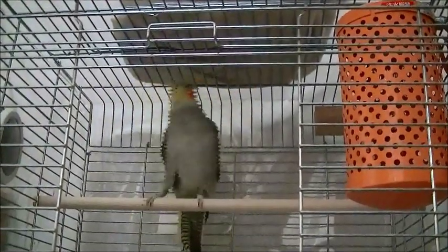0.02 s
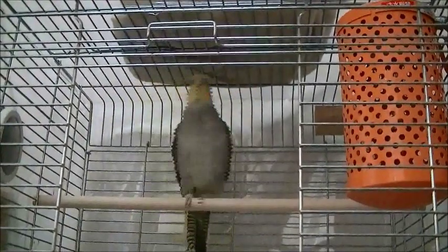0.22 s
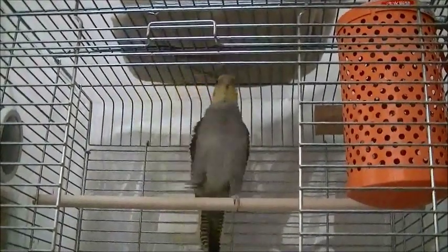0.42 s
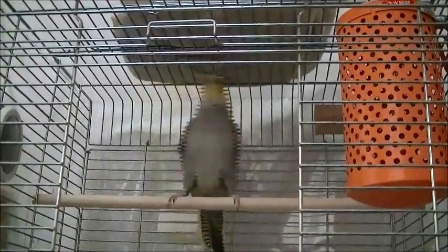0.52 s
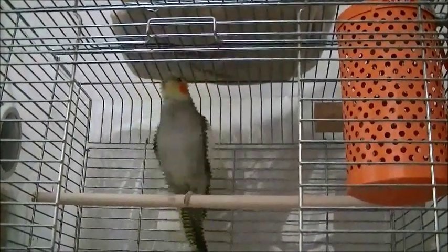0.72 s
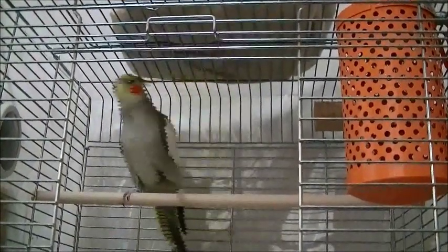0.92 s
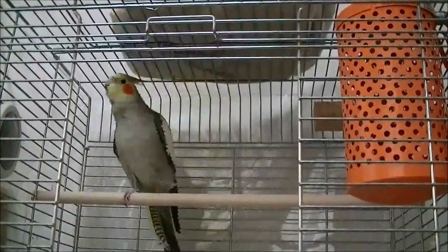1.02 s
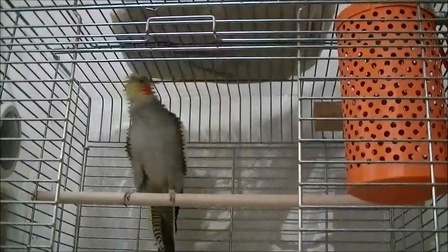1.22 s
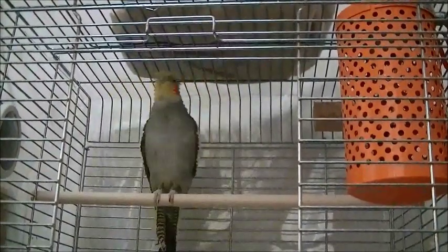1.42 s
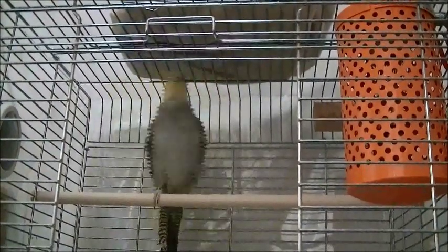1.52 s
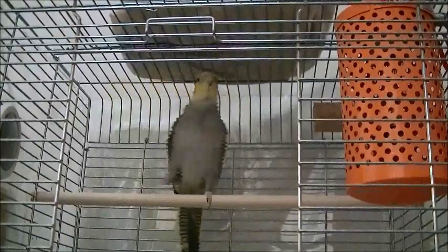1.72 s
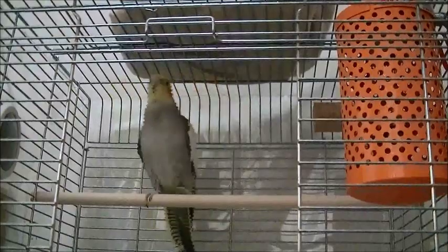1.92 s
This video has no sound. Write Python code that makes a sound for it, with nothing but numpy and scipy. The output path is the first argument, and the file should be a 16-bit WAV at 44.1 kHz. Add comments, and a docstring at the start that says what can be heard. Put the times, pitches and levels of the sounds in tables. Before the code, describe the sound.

Four brief whistled chirps come from a cockatiel in a nearby cage, clear and high but a little rough in places, each falling off in pitch. A small room adds a short ring and a faint hum.

```python
"""Caged cockatiel whistling

A caged cockatiel whistles four short arched chirps in a small room, as the ring of an earlier one dies away.
Each is a nearly pure gliding sine with faint overtones shaped by throat and beak, plus a touch of air noise;
the voice cracks in places with sudden jumps of pitch, roughened by random jitter of pitch and level, and the
pitch drops at the end. Decaying noise bands ring after each chirp over a low noise rumble and hum; a limiter
levels the peaks."""
import sys
import numpy as np
from scipy import signal
from scipy.fft import rfft, irfft, next_fast_len
from scipy.io import wavfile
from scipy.ndimage import uniform_filter1d

SR = 44100
rng = np.random.default_rng(int(sys.argv[2]) if len(sys.argv) > 2 else 0)


def persist_wave(psi):
    """Save psi, clipped to +-1, as 16-bit WAV."""
    counts = np.round(np.clip(psi, -1, 1) * 32767).astype(np.int16)
    wavfile.write(sys.argv[1], SR, np.atleast_2d(counts).T)


N = 85995
LEAD = int(0.2 * SR)   # samples computed before the scene starts, so the earlier chirp can ring into it
TIME = np.arange(-LEAD, N) / SR

# glide of each whistle: time_s, pitch_hz, relative_level_db, roughness (0 to 1), brightness_db
EARLIER_CHIRP = [(-.15, 2472, -1.5, 0.18, -2.5), (-.08, 2631, -21, .1, 8), (-.03, 2570, -23, .1, -1.5),
                 (-.018, 2505, -23.5, .3, -1), (-.008, 1690, -31.5, .5, -6)]
CHIRP_1 = [(0.208, 2162, -36, .1, -6.5), (.224, 2436, -13.5, .05, -5), (0.234, 2423, -10, .05, -4.5),
           (0.252, 2368, -13, .3, -1), (0.255, 2133, -16, 1, -2.5), (0.263, 2331, -14.5, .6, 0),
           (0.272, 2055, -20.5, 0.84, -1), (0.274, 2420, -14, .4, -0.5), (0.292, 2428, -4, .25, -4),
           (0.301, 2358, -8, .25, -0.5), (0.327, 2376, -11.5, .1, 2), (0.336, 2192, -8.5, .2, -3),
           (.355, 2034, -14, 0.45, -1), (0.366, 1630, -21.5, .5, -2.5)]
CHIRP_2 = [(0.586, 2120, -28.5, 0.2, -4), (0.597, 2428, -14.5, 0.062, -8.5), (0.612, 2423, -7.5, 0.064, -3),
           (0.628, 2387, -7.5, 0.096, -10), (.646, 2396, -10.5, 1, -1.5), (.656, 2552, -20, 0.95, 5),
           (0.67, 2741, -14.5, 0.23, -5.5), (0.683, 2718, -22, 0.26, -6), (0.699, 2480, -20.5, 0.54, -3.5),
           (0.708, 2314, -23, 0.98, -1.5)]
CHIRP_3 = [(1.004, 2156, -30, 0.15, -3.5), (1.010, 2384, -28.5, 0.24, -8), (1.03, 2455, -16.5, 0.07, -3),
           (1.05, 2397, -13.5, 0.044, -6), (1.068, 2537, -18, 0.26, 2), (1.087, 2660, -22.5, 1, -1.5),
           (1.104, 2698, -21.5, 0.29, 2), (1.124, 2724, -10.5, 0.18, 0), (1.138, 2665, -17.5, 0.12, 1),
           (1.164, 2654, -16, 0.3, 0.5), (1.195, 2595, -10, 0.21, -2), (1.207, 2464, -18.5, .5, -7),
           (1.209, 1918, -23.5, .9, -1.5), (1.213, 1676, -30.5, .8, -4)]
CHIRP_4 = [(1.483, 2073, -28, 0.047, -10), (1.496, 2345, -21.5, 0.065, 3.5), (1.509, 2359, -16, 0.047, -5),
           (1.528, 2294, -25.5, 0.13, 13), (1.533, 2044, -17, 0.8, 2.5), (1.544, 2405, -8.5, .5, -9.5),
           (1.563, 2508, -22, .15, -1.5), (1.587, 2520, -18, .05, 5.5), (1.609, 2469, -11, .05, -9),
           (1.636, 2157, -13.5, 0.39, -2), (1.656, 2121, -16, 0.087, -2), (1.668, 1627, -25.5, .5, -1)]
# how airy each of the five chirps is, in order: air_db
CHIRP_AIR_DB = [-1.5, -0.5, 0.5, -1.5, 1]
# strength of the fundamental by its pitch: pitch_hz, gain_db
FUNDAMENTAL_GAIN = [(1600, -13.5), (2000, -7.5), (2400, -6), (2800, 1)]
# harmonics 2 to 6 at the voice source: gain_db
OVERTONES_DB = [0, 2, 0, 1.5, 2.5]
# throat and beak response for the overtones: frequency_hz, gain_db
BEAK_RESPONSE = [(3200, -16.5), (3800, -24.5), (4300, -23.5), (4600, -26.5), (4850, -31.5), (5450, -33.5),
                 (5850, -38.5), (6300, -35.5), (7150, -35), (8100, -38.5), (9000, -60.5), (9800, -49),
                 (10700, -38), (12000, -41.5), (13200, -35), (14300, -37.5), (15500, -52.5)]
# second harmonic, which comes and goes: time_s, gain_db
SECOND_HARMONIC = [(.232, 3.5), (.25, -2.5), (.272, 0), (.29, -9), (.322, -6.5), (.338, 1.5), (.61, 3.5),
                   (.63, -5), (.65, 2.5), (1.05, 3.5), (1.18, 0), (1.535, 1), (1.57, -0.5), (1.615, -4),
                   (1.645, 1.5)]
# fading of harmonics 3 to 6 when the pitch sags: pitch_hz, gain_db
SAG_DULLING = [(1800, -15), (2150, -2)]
# colour of the air hiss in the whistle: frequency_hz, density_db (per Hz)
AIR_SPECTRUM = [(300, -13), (1200, 0.5), (2300, 4), (3500, -1), (4500, -5.5), (5900, -21), (7200, -10),
                (9200, -18.5), (11500, -2.5), (14500, -5.5), (16000, -14)]
# echoes off the cage tray and near walls: delay_s, gain_db
ECHOES = [(.0047, -16), (0.0104, -12), (0.0165, -31)]
# decay time of the room ring: frequency_hz, t60_s
ROOM_T60 = [(500, 0.13), (2400, 0.25), (5000, 0.25), (8000, 0.17), (15000, 0.13)]
# weighting of the room ring before its overall level is set: frequency_hz, gain_db
ROOM_COLOUR = [(700, -12.5), (2150, 1), (4400, 1), (7700, 6.5), (13000, 1.5)]
# colour of the room background: frequency_hz, density_db (per Hz)
RUMBLE_SPECTRUM = [(25, -27.5), (48, -31), (70, -13), (120, -9), (210, -1), (300, -5), (480, -12),
                   (750, -14), (1500, -19.5), (2400, -17.5), (3900, -25.5), (4600, -21), (7300, -32.5),
                   (10000, -33.5), (14300, -37.5), (15500, -49.5)]
# slow swell of the rumble and hum together: time_s, gain_db
RUMBLE_SWELL = [(.1, 0), (.4, -0.5), (.88, 0), (1.4, -1), (1.75, 2), (1.93, 0)]
# faint hum components: frequency_hz, nominal_level_db (rms)
HUM = [(81, -69.5), (161, -72.5), (196, -64), (260, -72)]

VOICE_DB, AIR_DB = 2, -44.5   # offset of every chirp; air hiss relative to the tone
ATTACK_S, RELEASE_S = 0.0028, 0.015
JITTER, SHIMMER_DB, JITTER_HZ = 0.016, 4, 87   # at full roughness: share of the pitch, level flutter; speed
WAVER, WAVER_HZ = 0.0016, 37.6   # slight unsteadiness of every note: share of the pitch, speed
BREATHY, BREATHY_HZ = 0.12, 100   # turbulence that widens the overtones: depth, speed
DOUBLING_DB, DOUBLING_AFTER_S, DOUBLING_WIDTH_S = -40.5, 0.015, 0.008
BLOOM_DB, BLOOM_S = -7.5, 0.026   # harmonics 3 to 6 start weak and open up
ROOM_DB, ROOM_SIDE_DB, ROOM_BUILD_S = -8.5, -18, 0.0023   # side level is relative to the mid
PAN_DB = 1   # left over right
RUMBLE_DB, RUMBLE_SIDE_DB = -57, -19.5   # mid before the swell; side relative to it
HUM_WANDER_DB, HUM_WANDER_RAD = -2, 0.54   # spreads of level and phase
LIMIT_DB, LIMIT_SMOOTH_S, LIMIT_RELEASE_DB_PER_S = -10.5, 0.00067, 147.5


def from_db(db):
    """Decibels are logarithmic: 20 dB is a tenfold amplitude."""
    return 10 ** (np.asarray(db) / 20)


def at_hz(points, hz):
    """Interpolate a table along a logarithmic frequency axis."""
    table = np.array(points, float)
    return np.interp(np.log(np.maximum(hz, 1)), np.log(table[:, 0]), table[:, 1])


def at_time(points):
    """Interpolate a table linearly along the time axis."""
    return np.interp(TIME, *np.transpose(points))


def drift(rate_hz):
    """Random modulation: white noise through a two-pole low-pass, scaled to a spread of 1."""
    pole = np.exp(-2 * np.pi * rate_hz / SR)
    white = rng.standard_normal(len(TIME) + LEAD)
    slow = signal.lfilter([1], [1, -2 * pole, pole * pole], white)[LEAD:]   # drop the filter's settling
    return slow / slow.std()


def noise(spectrum):
    """Spectral shaping: white noise weighted by frequency, scaled to rms 1."""
    size = next_fast_len(len(TIME))
    white = rfft(rng.standard_normal(size))
    hz = np.arange(len(white)) * SR / size
    shaped = irfft(white * from_db(at_hz(spectrum, hz)), size)[:len(TIME)]
    return shaped / shaped.std()


def overtones(phase, hz, bright_db, start_s):
    """Source and filter: harmonics 2 to 6, widened by turbulence and weighted by throat and beak."""
    bloom_db = BLOOM_DB * np.clip(1 - (TIME - start_s) / BLOOM_S, 0, 1)
    upper_db = at_hz(SAG_DULLING, hz) + bloom_db
    second_db = at_time(SECOND_HARMONIC)
    total = 0
    for k, source_db in enumerate(OVERTONES_DB, 2):
        amplitude = 1 + BREATHY * drift(BREATHY_HZ)
        partial = amplitude * np.sin(k * phase + BREATHY * drift(BREATHY_HZ))
        extra_db = upper_db if k > 2 else second_db
        gain_db = at_hz(BEAK_RESPONSE, k * hz) + source_db + bright_db + extra_db
        total = total + from_db(gain_db) * partial
    return total


def chirp(rows, air_db):
    """Frequency modulation: phase is the integral of a gliding pitch; overtones and air noise are added."""
    time_s, *columns = np.transpose(rows)
    hz, db, rough, bright_db = (np.interp(TIME, time_s, column) for column in columns)
    rough = np.clip(rough, 0, 1)
    since_start = TIME - time_s[0]
    hz = hz * (1 + JITTER * rough * drift(JITTER_HZ) + WAVER * drift(WAVER_HZ))
    phase = 2 * np.pi * np.cumsum(hz) / SR

    attack = np.clip(since_start / ATTACK_S, 0, 1)
    release = np.clip((time_s[-1] - TIME) / RELEASE_S + .5, 0, 1)
    envelope = np.sin(attack * release * np.pi / 2) ** 2
    level = envelope * from_db(VOICE_DB + db + SHIMMER_DB * rough * drift(JITTER_HZ))

    # brief period doubling near the start: partials at 1/2 and 3/2 of the pitch
    doubling_shape = ((since_start - DOUBLING_AFTER_S) / DOUBLING_WIDTH_S) ** 2
    doubling = from_db(DOUBLING_DB) * np.exp(-np.minimum(doubling_shape, 20))
    fundamental = from_db(at_hz(FUNDAMENTAL_GAIN, hz)) * np.sin(phase)
    fundamental = fundamental * (1 + 2 * doubling * np.cos(phase / 2))

    tone = fundamental + overtones(phase, hz, bright_db, time_s[0])
    air = from_db(AIR_DB + air_db + bright_db) * noise(AIR_SPECTRUM)
    return level * (np.sqrt(2) * tone + air)


def room_ring(x):
    """Reverberation: convolution with noise bands that decay exponentially, each at its own rate."""
    t = np.arange(SR // 2) / SR
    white = rng.standard_normal((2, len(t)))
    response = 0
    edges_hz = [300, 1400, 3300, 6000, 10000, 17000]
    for k, (low, high) in enumerate(zip(edges_hz, edges_hz[1:])):
        centre_hz = np.sqrt(low * high)
        band_filter = signal.butter(2, [low, high], "band", fs=SR, output="sos")
        band = signal.sosfilt(band_filter, white[k % 2])   # neighbouring bands use separate noise
        decay = np.exp(-np.log(1000) * t / at_hz(ROOM_T60, centre_hz))   # 60 dB down after t60
        response = response + band * from_db(at_hz(ROOM_COLOUR, centre_hz)) * decay
    response = response * (1 - np.exp(-t / ROOM_BUILD_S))
    response = response / np.sqrt(np.sum(response ** 2))   # unit energy
    return signal.fftconvolve(x, response)[:len(x)]


def cockatiel():
    """Superposition: direct voice, delayed near echoes and room ring, with the ring spread mid and side."""
    chirps = (EARLIER_CHIRP, CHIRP_1, CHIRP_2, CHIRP_3, CHIRP_4)
    voice = sum(chirp(rows, air_db) for rows, air_db in zip(chirps, CHIRP_AIR_DB))
    echoes = sum(from_db(db) * np.interp(TIME - delay, TIME, voice) for delay, db in ECHOES)
    mid = voice + echoes + from_db(ROOM_DB) * room_ring(voice)
    side = from_db(ROOM_DB + ROOM_SIDE_DB) * room_ring(voice)
    return np.array([mid + side, mid - side]) * from_db([[PAN_DB / 2], [-PAN_DB / 2]])


def hum():
    """Narrow-band tones: sines whose level and phase wander at random."""
    total = 0
    for hz, db in HUM:
        level = from_db(db + HUM_WANDER_DB * drift(3))
        phase = 2 * np.pi * hz * TIME + HUM_WANDER_RAD * drift(10)
        total = total + level * np.sqrt(2) * np.sin(phase)
    return total


def background():
    """Broadband noise: a low room rumble, with the hum in its centre, under one slow swell."""
    mid = from_db(RUMBLE_DB) * noise(RUMBLE_SPECTRUM) + hum()
    side = from_db(RUMBLE_DB + RUMBLE_SIDE_DB) * noise(RUMBLE_SPECTRUM)
    return np.array([mid + side, mid - side]) * from_db(at_time(RUMBLE_SWELL))


def scene():
    """Superposition of the bird and its room, with a 3 ms fade-in."""
    fade_in = np.clip(TIME / .003, 0, 1)
    return ((cockatiel() + background()) * fade_in)[:, LEAD:]


def record(dry):
    """Gain reduction: the recorder's limiter holds peaks down and recovers steadily; the top is cut."""
    peak_db = 20 * np.log10(np.abs(dry).max(axis=0) + 1e-9)
    over_db = np.maximum(peak_db - LIMIT_DB, 0)
    fall_db = LIMIT_RELEASE_DB_PER_S * np.arange(N) / SR
    held_db = np.maximum.accumulate(over_db + fall_db) - fall_db   # instant rise, linear fall in dB
    reduction_db = uniform_filter1d(held_db, max(int(LIMIT_SMOOTH_S * SR), 1))
    limited = dry * from_db(-reduction_db)
    low_pass = signal.cheby2(16, 60, 16000, fs=SR, output="sos")   # 60 dB down from 16 kHz up
    return signal.sosfilt(low_pass, limited)


dry = scene()
out = record(dry)
persist_wave(out)
```